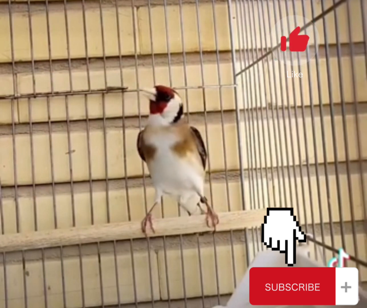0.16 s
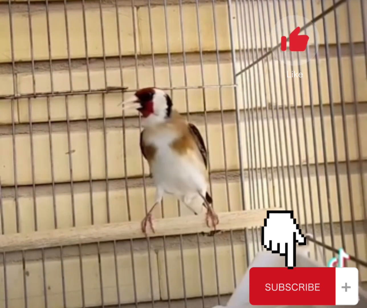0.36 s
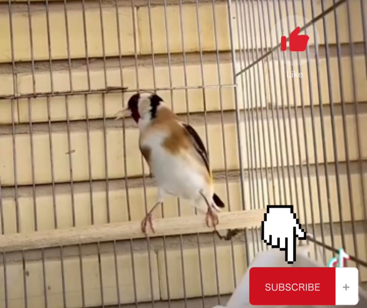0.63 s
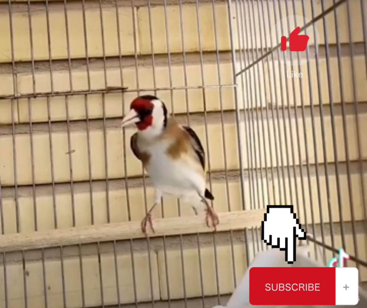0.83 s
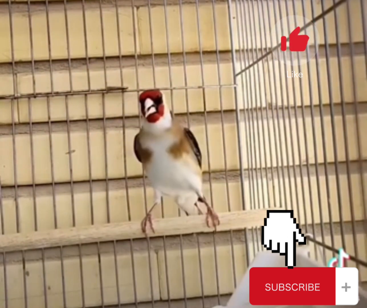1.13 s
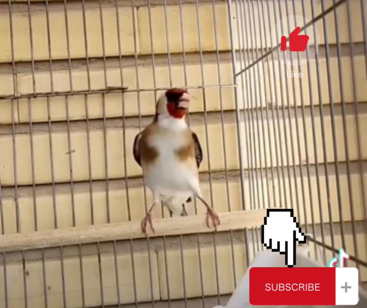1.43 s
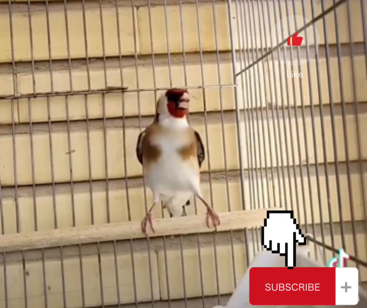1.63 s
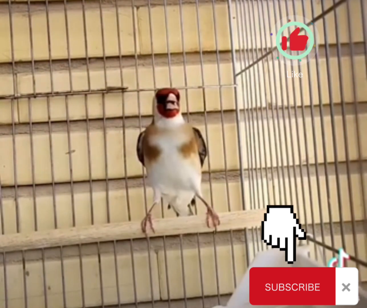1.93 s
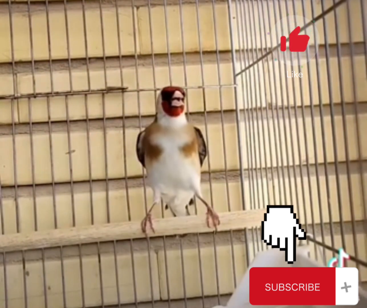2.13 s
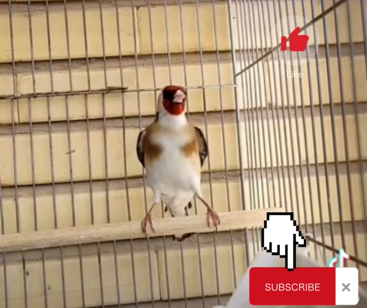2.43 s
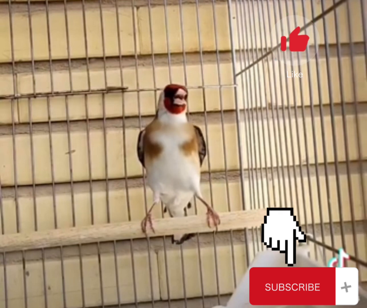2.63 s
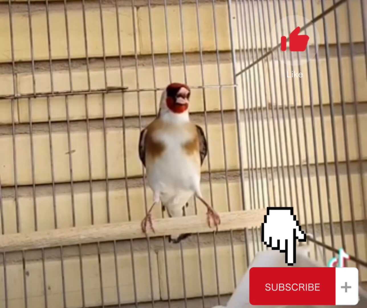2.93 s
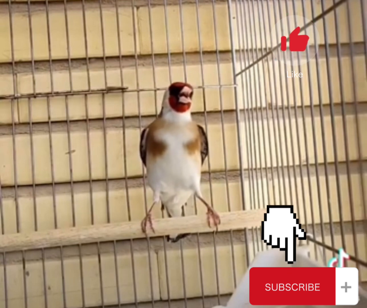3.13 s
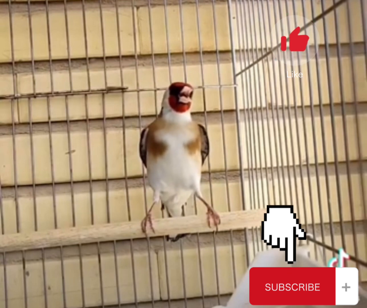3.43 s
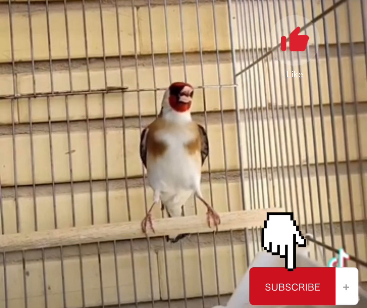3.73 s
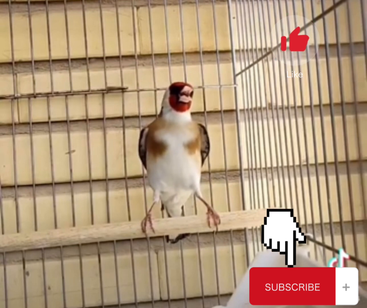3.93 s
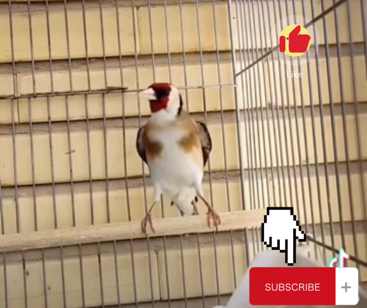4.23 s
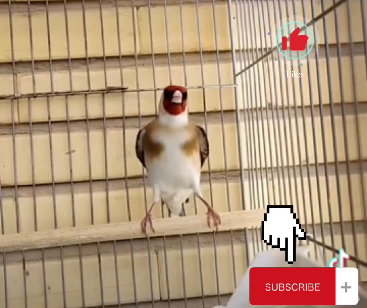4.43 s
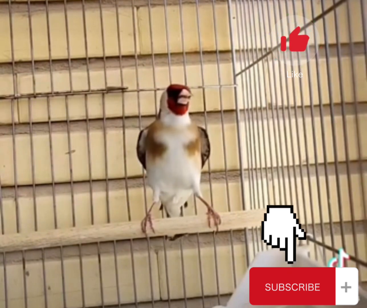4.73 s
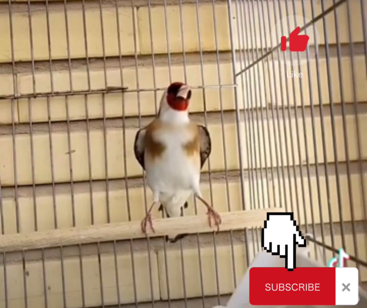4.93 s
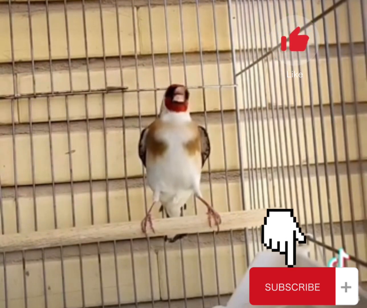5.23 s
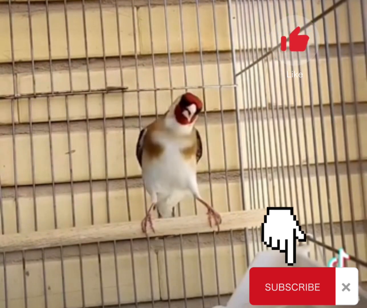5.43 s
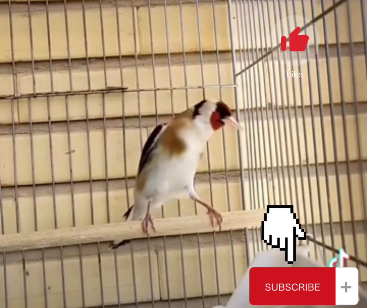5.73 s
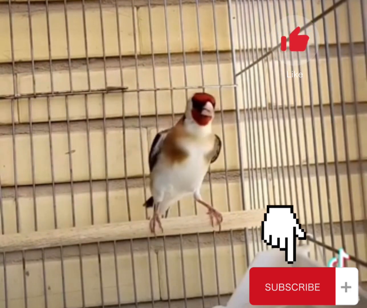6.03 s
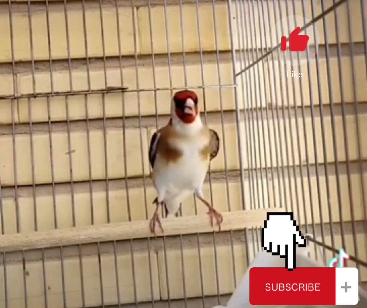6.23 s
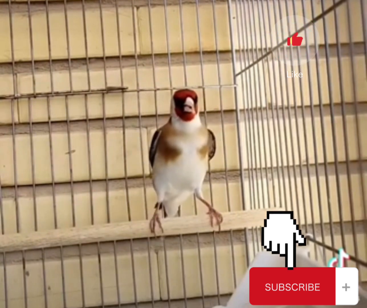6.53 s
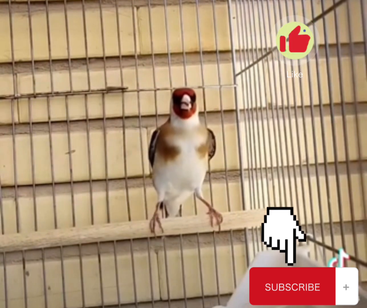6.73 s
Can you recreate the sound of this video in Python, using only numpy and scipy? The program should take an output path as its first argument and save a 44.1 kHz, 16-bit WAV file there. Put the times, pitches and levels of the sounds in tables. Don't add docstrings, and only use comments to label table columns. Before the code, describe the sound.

A small finch sings very close in a wire cage beside a wall. Quick swooping notes and a falling slide lead to an even eight-figure trill, then a rough churr, sharp pips and a low buzz. After about a second and a half of traffic hum and faint distant whistles, a second phrase of rising chirps ends in a long buzz, a fast dry rattle and a closing note. Stereo, slightly shifting, with thin compressed treble.

```python
import sys
import numpy as np
from scipy import signal
from scipy.fft import rfft, irfft
from scipy.io import wavfile
from scipy.ndimage import uniform_filter1d

SR = 44100
rng = np.random.default_rng(int(sys.argv[2]) if len(sys.argv) > 2 else 0)


def master_out(mix):
    frames = np.transpose(np.atleast_2d(mix))
    ceiling = np.clip(frames, -1, 1)
    pcm = np.round(ceiling * 32767).astype(np.int16)
    wavfile.write(sys.argv[1], SR, pcm)


def gain_from_db(level_db):
    decades = np.asarray(level_db, float) / 20
    return 10 ** decades


N = 302967

# f/Hz, level/dB per Hz
HUM_SPECTRUM = [(12, -52.5), (20, -3), (93, -1.5), (148, -8), (236, -17), (278, -15), (766, -18),
                (928, -18), (1040, -18.5), (3190, -26), (3970, -22.5), (4810, -32), (12500, -33.5),
                (14000, -74)]
HUM_DB = -44.5
# f/Hz, correlation
HUM_CORRELATION = [(60, 0.85), (180, 0.9), (530, 0.89), (1600, 0.44), (4770, 0.33), (14200, 0.12)]
# t/s, left minus right level/dB
HEAD_TURNS = [(0.0, -1), (0.48, -6.5), (0.649, 0), (0.82, -6.5), (1.07, 5), (1.59, -5.5), (1.76, 2.5),
              (2.07, -3.5), (2.559, 2), (3.861, 17.5), (4.151, -8), (4.26, 3), (4.82, 5.5), (5.43, -1),
              (5.8, 0), (5.95, -6), (6.39, 9.5), (6.52, -7.5)]
# left delay/s, right delay/s, level/dB
ECHOES = [(.0031, 0.0043, -9.5), (.0078, 0.015, -7), (0.0122, 0.0092, -15)]
# f/Hz, level/dB
MIC_RESPONSE = [(1300, -22), (2100, -0.5), (5000, -2), (9000, 1.5), (11500, -1), (12500, -12),
                (14000, -18.5)]
# t/s, length/s, start f/Hz, end f/Hz, level/dB
FAR_WHISTLES = [
    (3.314, 0.16, 3750, 4020, -56.5),
    (3.55, 0.23, 3820, 4130, -60),
    (3.846, 0.2, 3660, 4000, -57.5),
]

# f/Hz, level/dB per Hz
AIR_SPECTRUM = [(1500, -55), (2300, -9.5), (3500, 8), (5600, -4), (6400, -11.5), (7200, -25), (7900, -4.5),
                (10500, -19), (12000, -16.5), (13500, -16)]
# f/Hz, level/dB
WINDPIPE = [(1700, -17.5), (2500, 0), (5700, -1.5), (6300, -14), (6900, -21.5), (7500, -20.5), (8200, -0.5)]

# share of length, pitch f/Hz, fundamental level/dB, overtone level/dB
SWOOP = [(0, 2403, -13.5, -17.5), (.22, 3040, 0.5, -21.5), (.46, 3340, -12.5, -3.5),
         (.74, 3462, -29.5, -5.5), (1, 3583, -16, -24)]
SLIDE = [(0, 6950, -9, -14), (.13, 6650, -6, -5), (.22, 5810, -7.5, 3), (.31, 4740, -4.5, -3),
         (.46, 4180, -2.5, -10), (.6, 3853, 0, 2.5), (.81, 3520, -4, 4), (1, 3728, -11.5, -18)]
CLIMB = [(0, 6220, -13.5, -26), (.21, 5430, 1, -12.5), (.4, 5975, 1, 0.5), (.56, 6740, -0.5, -66),
         (.75, 7410, -2.5, -32), (1, 7900, -52, -24)]
BUZZ = [(0, 4900, -11, -14), (.12, 4345, 0, -2), (.25, 3770, 0, -6.5), (.43, 2842, -9, -16.5),
        (.68, 2780, -9, -19), (1, 2547, -21.5, -29.5)]
CLOSE = [(0, 4140, -26, -31.5), (.31, 3720, 2.5, -2), (.65, 2970, -25, -20), (1, 2993, 1.5, -32)]
# shape, third harmonic re second level/dB, warble f/Hz, depth as share of pitch, throb (0-1)
VOICES = [
    (SWOOP, -7.5, 110, 0.013, 0.17),
    (SLIDE, -17, 114.2, 0.021, 0.53),
    (CLIMB, -22, 178, 0.033, 0.01),
    (BUZZ, 2.5, 91, .125, 0.34),
    (CLOSE, -10, 125.3, .031, 0.25),
]
# t/s, length/s, fundamental level/dB, overtone level/dB
LONG_NOTES = [
    [(0, 0.073, -15.5, -17.5), (.185, 0.081, -17.5, -18), (1.875, 0.19, -21, -19), (5.125, .16, -18, -17)],
    [(.425, 0.35, -15, -31.5)],
    [(1.496, 0.16, -17.5, -24.5)],
    [(2.284, 0.2, -18, -31), (5.503, .26, -21.5, -35)],
    [(6.612, 0.075, -16, -4)],
]

# t/s, length/s, start f/Hz, end f/Hz, level/dB
RISES = [(.092, 0.029, 4133, 5180, -13.5), (.272, 0.025, 4103, 5356, -14.5),
         (0.398, 0.098, 8300, 7880, -38.5), (4.092, 0.026, 1885, 5020, -23), (4.434, .027, 2028, 3250, -24),
         (4.554, .028, 2335, 3180, -25), (6.679, 0.013, 2800, 4320, -17)]
CHURRS = [(1.854, 0.054, 4007, 5425, -25), (2.181, 0.051, 2790, 8700, -23),
          (5.099, 0.058, 4050, 5660, -24.5), (5.412, .035, 3336, 8220, -22.5)]
FALLS = [(6.595, 0.0094, 5950, 4605, -16.5)]
PIPS = [(1.589, 0.041, 6670, 7600, -28), (1.716, 0.02, 4884, 5055, -12), (2.14, 0.023, 4864, 5010, -6)]

# third harmonic level/dB, half-pitch level/dB, air level/dB,
# bend, peakedness, lateness of peak
RISE = (-12.5, -37.5, -14, 1.22, 0.96, 1.21)
CHURR = (-17.5, -9, -14, 1.7, 0.45, 1.13)
FALL = (-9.5, -46, -18, 2, 0.85, 0.58)
PIP = (-28, -55, -35.5, 1.33, 0.7, 1.12)
TICK = (-14, -11.5, -9.5, 1.88, 1.7, 0.77)
CHIRP = (-14.5, -30.5, -11, 1.6, 1, 1.69)
HOOK = (-19, -14, -10, 1, 0.3, 1.7)
HAZE = (-26, -32, 8.5, 2, 1.3, 0.55)
RASP = (.35, .6, .1, .07, .25, .25, .7, .7)
SECOND_DB = (-14.5, -5, -12.5, -21, -15, -12, -25, -19.5)

# t/s, high note f/Hz, high note level/dB, rise level/dB
TRILL = [(.848, 6960, -18.5, -14), (.925, 5884, -15.5, -14), (1.004, 5900, -18, -15),
         (1.078, 6600, -17, -15), (1.162, 6300, -21, -16), (1.239, 6350, -21, -15),
         (1.32, 6010, -17.5, -14), (1.404, 6510, -18.5, -17)]
HIGH_S, HIGH_END_HZ, HAZE_AFTER_S, RISE_AFTER_S = 0.021, 5826, 0.007, 0.028
# length/s, start f/Hz, end f/Hz, level/dB
TRILL_HAZE = (0.0251, 5503, 2499, -38.5)
# length/s, start f/Hz, end f/Hz
TRILL_RISE = (.025, 3000, 5430)
# t/s, level/dB
HOOKS = [
    (1.775, -28),
    (5.027, -27),
]
# length/s, start f/Hz, end f/Hz
HOOK_UP = (.022, 2500, 3900)
HOOK_DOWN = (.024, 3800, 2200)
HOOK_TURN_S = 0.017
# t/s, level/dB, under voice level/dB
CHIRPS = [(4.168, -16.5, -20.5), (4.348, -16.5, -20.5), (4.485, -15, -23.5), (4.603, -13.5, -28),
          (4.725, -15.5, -24), (4.843, -17, -24), (4.96, -14.5, -21)]
# length/s, start f/Hz, end f/Hz
CHIRP_UP = (.045, 1800, 5700)
UNDER = (0.019, 2800, 4650)
UNDER_AFTER_S, PEEP_S = 0.017, 0.027
# t/s, start f/Hz, end f/Hz, level/dB
PEEPS = [(4.27, 2620, 2935, -22), (4.683, 2437, 2884, -20), (4.799, 2487, 2814, -20.5),
         (4.921, 2327, 2940, -23)]
# t/s, level/dB, lean towards the high start level/dB
RATTLE = [(5.8524, -8.5, 0.5), (5.9013, -8.5, -0.5), (5.9496, -7.5, 2), (6.0045, -9, -0.5),
          (6.0545, -10.5, 0.8), (6.104, -8.5, 1.5), (6.1597, -8, 1.1), (6.2133, -7, 3.5), (6.2642, -8, 0.5),
          (6.316, -7.5, 1), (6.37, -9.5, -1), (6.425, -7.5, 0.3), (6.4764, -5.5, 1.2), (6.5305, -9, 2.5)]
# start f/Hz, end f/Hz
TICK_HEAD_HZ = (5430, 4523)
TICK_TAIL_HZ = (4636, 3350)
TICK_HEAD_S, TICK_BREAK_S, TICK_TAIL_S = 0.015, 0.005, 0.022

SPLIT, TOP, SHIFT, SLOT, FIRST = 19, 40, 16, 8, 3
LIMIT_EDGES = [0, 7, 16]
# t/s, length/s, f/Hz, level/dB
TONES = [(0.033, 0.044, 6680, -19), (0.215, 0.035, 6680, -19.5), (0.401, 0.054, 8340, -29),
         (0.578, 0.023, 8400, -32), (1.72, 0.037, 10540, -41), (2.002, 0.051, 11150, -34.5),
         (2.326, 0.031, 12000, -41), (4.092, 0.026, 6718, -42), (4.181, 0.022, 6610, -35),
         (4.349, 0.019, 6718, -37), (4.719, 0.038, 6660, -39.5), (5.181, 0.026, 6564, -18.5),
         (5.428, 0.03, 8441, -18), (5.525, 0.048, 8400, -36), (6.661, 0.015, 6029, -18.5)]
# f/Hz, level/dB
THRIFT = [(5600, -0.5), (6500, 12), (7400, 6), (8200, 1), (11000, -4.5), (12000, 8)]


def evened(x):
    return x / np.sqrt(np.mean(abs(x) ** 2) + 1e-20)


def read(points, hz):
    f, value = np.transpose(points)
    return np.interp(np.log(hz + 1), np.log(f + 1), value)


def add(mix, s, sound):
    part = mix[..., round(s * SR):][..., :len(sound)]
    part += sound[:part.shape[-1]]


def wobble(noise, size):
    return evened(uniform_filter1d(uniform_filter1d(noise, size), size))


def hum():
    frames, hz = N // 256 + 5, np.fft.rfftfreq(1024, 1 / SR)
    a, b, c, d, patches = rng.standard_normal((frames, 513, 5)).T
    patches = uniform_filter1d(patches, size=12, axis=0)
    patches = evened(uniform_filter1d(patches, size=14, axis=1))
    same = np.clip(read(HUM_CORRELATION, hz), -1, 1)[:, None]
    left = a + 1j * b
    right = same * left + np.sqrt(1 - same ** 2) * (c + 1j * d)
    balance_db = np.array([0.4, -0.4])[:, None, None]
    z = np.array([left, right]) * gain_from_db(read(HUM_SPECTRUM, hz)[:, None] + 1.2 * patches + balance_db)
    return gain_from_db(HUM_DB) * evened(signal.istft(z, nperseg=1024, noverlap=768)[1][:, :N])


def finch():
    hz = np.fft.rfftfreq(N + 1, 1 / SR)
    fast = np.array([wobble(v, size=14) for v in rng.standard_normal((2, N))])
    air = irfft(rfft(rng.standard_normal(N + 1)) * gain_from_db(read(AIR_SPECTRUM, hz)))[:N]
    chance = np.vstack([fast, evened(air)])
    slow = wobble(rng.standard_normal(N), size=150)
    kinds = (RISE, CHURR, FALL, PIP, TICK, CHIRP, HOOK, HAZE)
    rise, churr, fall, pip, tick, chirp, hook, haze = (
        syllables(*row, chance) for row in zip(score(), kinds, RASP, SECOND_DB))
    sweeps = rise + chirp + hook + haze
    sweeps = irfft(rfft(sweeps, N + 1) * gain_from_db(read(WINDPIPE, hz)))[:N]
    return sweeps + churr + fall + pip + tick + long_notes(slow, fast[0])


def whistle(hz, levels_db):
    turn = 2 * np.pi * np.cumsum(hz) / SR
    return np.sqrt(2) * sum(gain_from_db(db) * np.sin((k + 1) * turn) for k, db in enumerate(levels_db))


def long_notes(chance, shake):
    out = np.zeros(N)
    for (shape, third_db, rate_hz, depth, throb), notes in zip(VOICES, LONG_NOTES):
        share, *columns = np.transpose(shape)
        for s, length, first_db, second_db in notes:
            u = np.linspace(0, 1, round(length * SR))
            hz, first, second = (np.interp(u, share, c) for c in columns)
            slow = chance[round(s * SR):][:len(u)]
            quick = shake[round(s * SR):][:len(u)]
            beat = 2 * np.pi * np.cumsum(rate_hz * (1 + 0.51 * slow)) / SR
            swell = (1 + throb * np.sin(beat + 1.7)) * gain_from_db(0.95 * slow[::-1])
            swell = swell * signal.windows.tukey(len(u), 0.12)
            warbled_hz = hz * (1 + depth * (np.sin(beat) + 0.38 * quick))
            levels_db = first + first_db, second + second_db, second + second_db + third_db
            add(out, s, swell * whistle(warbled_hz, levels_db))
    return out


def walls(x, near_t60=0.15, far_t60=0.39, far_db=-16, gap_s=0.0005):
    taps = np.zeros((2, SR // 2))
    grid = np.arange(0, SR // 2 - 24, 24)
    at = grid + rng.integers(0, 24, (2, len(grid)))
    np.put_along_axis(taps, at, rng.choice([-1., 1.], at.shape), axis=1)
    t = np.arange(SR // 2) / SR
    decay = gain_from_db(-60 * t / near_t60) + gain_from_db(far_db - 60 * t / far_t60)
    taps *= decay * np.clip(t / gap_s, 0, 1) ** 2
    return signal.fftconvolve(x[None], taps / np.linalg.norm(taps[0]), axes=1)[:, :N]


def syllables(rows, kind, rasp, second_db, chance):
    out = np.zeros(N)
    third_db, half_db, air_db, bend, peaked, skew = kind
    for s, length, start_hz, end_hz, db in rows:
        u = np.linspace(0, 1, round(length * SR))
        a, b, air = chance[:, round(s * SR):][:, :len(u)]
        hz = (end_hz + (start_hz - end_hz) * (1 - u) ** bend) * (1 + rasp * a / 10)
        swell = np.sin(np.pi * u ** skew).clip(0) ** peaked
        swell = swell * signal.windows.tukey(len(u), 0.2) * (1 + rasp * b)
        tone = whistle(hz, [db, db + second_db, db + third_db])
        half = (1 - u) * whistle(hz / 2, [db + half_db])
        add(out, s, swell * (tone + half + gain_from_db(db + air_db) * air))
    return out


def score():
    rises, falls, haze = trill()
    return rises + RISES, CHURRS, falls + FALLS, peeps() + PIPS, ticks(), chirps(), hooks(), haze


def trill():
    rises = [(s + RISE_AFTER_S, *TRILL_RISE, db) for s, _, _, db in TRILL]
    falls = [(s, HIGH_S, hz, HIGH_END_HZ, db) for s, hz, db, _ in TRILL]
    haze = [(s + HAZE_AFTER_S, *TRILL_HAZE) for s, *_ in TRILL]
    return rises, falls, haze


def hooks():
    up = [(s, *HOOK_UP, db) for s, db in HOOKS]
    return up + [(s + HOOK_TURN_S, *HOOK_DOWN, db) for s, db in HOOKS]


def far_bird():
    out = np.zeros(N)
    for s, length, start_hz, end_hz, db in FAR_WHISTLES:
        u = np.linspace(0, 1, round(length * SR))
        hz = start_hz + (end_hz - start_hz) * np.sqrt(u)
        add(out, s, np.sin(np.pi * u) * whistle(hz, [db]))
    return out * (1 + 0.38 * wobble(rng.standard_normal(N), size=200))


def chirps():
    upper = [(s, *CHIRP_UP, db) for s, db, _ in CHIRPS]
    return upper + [(s + UNDER_AFTER_S, *UNDER, db) for s, _, db in CHIRPS]


def peeps():
    return [(s, PEEP_S, *rest) for s, *rest in PEEPS]


def ticks():
    late, tune = rng.standard_normal((len(RATTLE), 2)).clip(-2, 2).T * [[0.0015], [0.018]]
    heads, tails = [], []
    for (s, db, lean), d, e in zip(RATTLE, late, 1 + tune):
        heads.append((s - 0.002, TICK_HEAD_S + d, *np.multiply(TICK_HEAD_HZ, e), db - 9.5 + lean))
        tails.append((s + TICK_BREAK_S + d, TICK_TAIL_S, *np.multiply(TICK_TAIL_HZ, e), db - 10.0 - lean))
    return heads + tails


def scene():
    grid = np.linspace(0, 1, 65)
    mic = signal.firwin2(129, grid, gain_from_db(read(MIC_RESPONSE, grid * SR / 2)))
    bird = signal.oaconvolve(finch(), mic, "same")
    pan_db = np.interp(np.arange(N) / SR, *np.transpose(HEAD_TURNS))
    near = gain_from_db(2.0 + np.array([pan_db, -pan_db]) / 2) * bird
    for left_s, right_s, db in ECHOES:
        add(near[0], left_s, gain_from_db(db) * bird)
        add(near[1], right_s, gain_from_db(db) * bird)
    return near + gain_from_db(-1.0) * walls(bird) + far_bird() + hum()


def grouped(power, edges, axis):
    width = np.diff(np.r_[edges, power.shape[axis]])
    mean = np.add.reduceat(power, edges, axis=axis) / (width[:, None] if axis == 1 else width)
    return np.repeat(mean, width, axis=axis) + 1e-14


def slots(power):
    power = grouped(power, np.r_[0, np.arange(FIRST, power.shape[-1], SLOT)], axis=2)
    return grouped(power, np.r_[0:6, 6:power.shape[1]:2], axis=1)


def coarse(x, step_db=-2.5):
    z = signal.stft(x, nperseg=1024, noverlap=512, window="cosine")[2]
    power = abs(uniform_filter1d(abs(z) ** 2, size=16, axis=1)) + 1e-16
    finer_bass = np.clip(np.linspace(0, 12, z.shape[1]), 0.1, 1)[:, None]
    step = gain_from_db(step_db) * np.sqrt(power) * finer_bass
    z = step * (np.round(z.real / step) + 1j * np.round(z.imag / step))
    return signal.istft(z, nperseg=1024, noverlap=512, window="cosine")[1][:, :N]


def rebuilt_treble(x, hiss_db=-10.0, limit_db=11.5):
    z, low = (signal.stft(v, nperseg=128, noverlap=96)[2] for v in (x, coarse(x)))
    copy = low[:, np.arange(TOP - SPLIT) % SHIFT + SPLIT - SHIFT]
    noise = evened(signal.stft(rng.standard_normal(N), nperseg=128, noverlap=96)[2][SPLIT:TOP])
    want, have = slots(abs(z[:, SPLIT:TOP]) ** 2), slots(abs(copy) ** 2)
    group_gain = grouped(want, LIMIT_EDGES, axis=1) / grouped(have, LIMIT_EDGES, axis=1)
    gain = np.sqrt(np.minimum(want / have, gain_from_db(limit_db) ** 2 * group_gain))
    high = (copy + gain_from_db(hiss_db) * np.sqrt(have) * noise) * gain
    z = np.concatenate([low[:, :SPLIT], high, gain_from_db(-47.0) * z[:, TOP:]], axis=1)
    out = signal.istft(z, nperseg=128, noverlap=96)[1][:, :N]
    for s, length, hz, db in TONES:
        size = round(length * SR)
        centre_hz = (hz // (SR / 128) + 0.5) * SR / 128
        add(out, s, signal.windows.tukey(size, 0.15) * whistle(np.full(size, centre_hz), [db]))
    return out


def gaps(x, below_db=-41.0, from_hz=1600, whim_db=4.5):
    hz, _, z = signal.stft(x, SR, nperseg=1024, noverlap=512, window="cosine")
    edges = np.arange(0, 513, 16)
    power = grouped((abs(z) ** 2).mean(0, keepdims=True), edges, axis=1)
    whim = evened(uniform_filter1d(rng.standard_normal((z.shape[2], 33)), size=8, axis=0))
    whim = whim.T[np.arange(513) // 16]
    bar = gain_from_db(below_db + read(THRIFT, hz)[:, None] + whim_db * whim) ** 2
    starved = (power < bar * power.max(axis=1, keepdims=True)) & (hz[:, None] > from_hz)
    z = z * np.where(starved, gain_from_db(-22.0), 1)
    return signal.istft(z, nperseg=1024, noverlap=512, window="cosine")[1][:, :N]


def roll_off(x):
    return signal.sosfilt(signal.butter(12, 14840, fs=SR, output="sos"), x)


def record(dry):
    loud = np.tanh(dry)
    mix = np.clip(gaps(rebuilt_treble(loud)), -0.95, 0.95)
    return roll_off(mix)


dry = scene()
out = record(dry)
master_out(out)
```